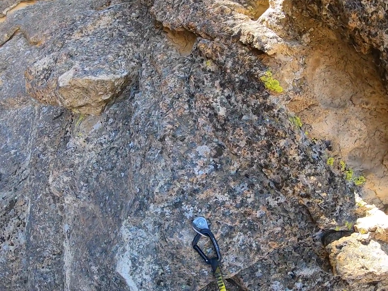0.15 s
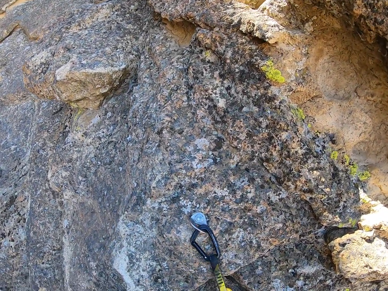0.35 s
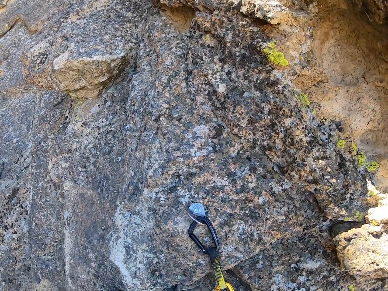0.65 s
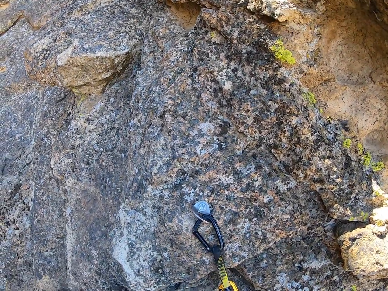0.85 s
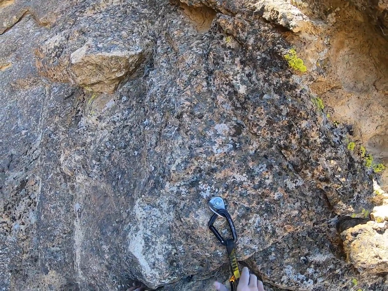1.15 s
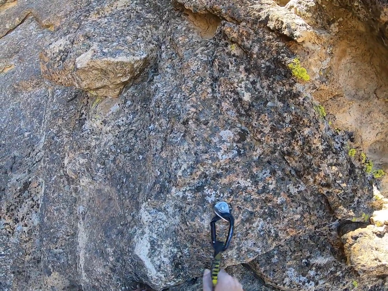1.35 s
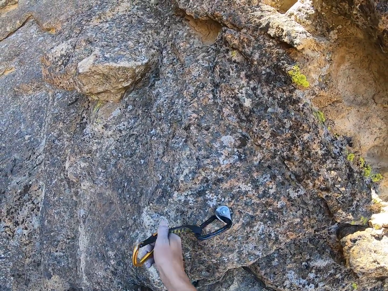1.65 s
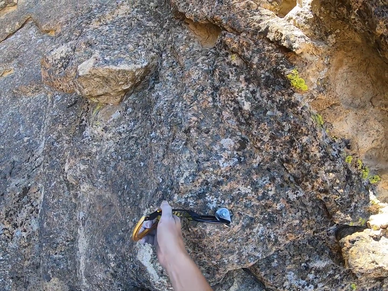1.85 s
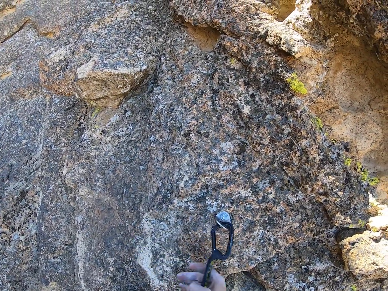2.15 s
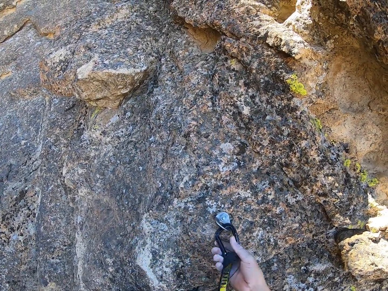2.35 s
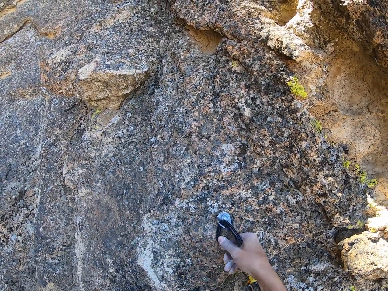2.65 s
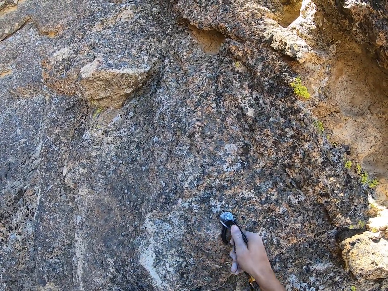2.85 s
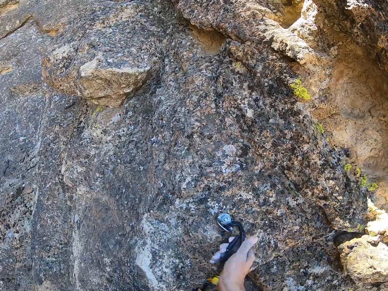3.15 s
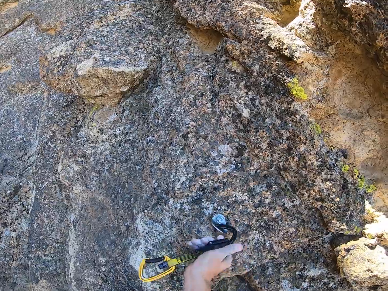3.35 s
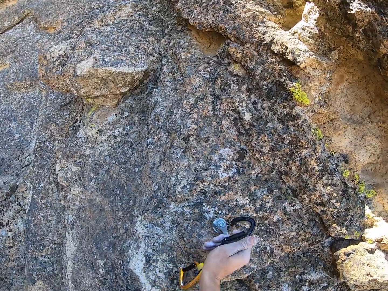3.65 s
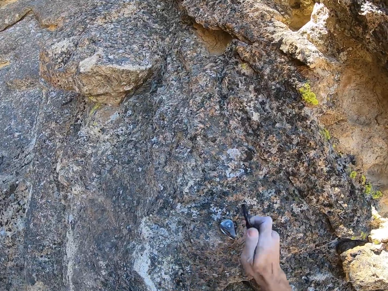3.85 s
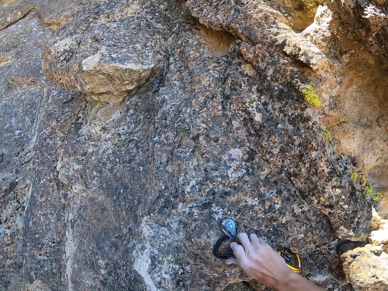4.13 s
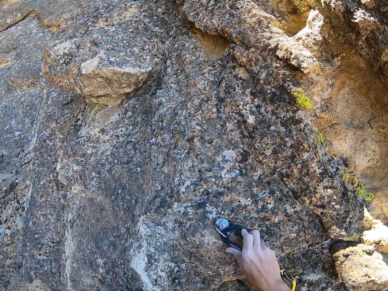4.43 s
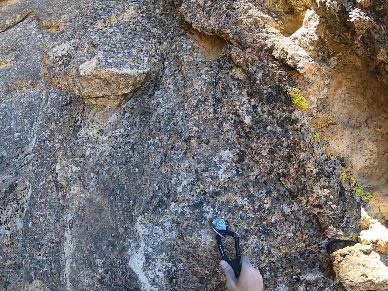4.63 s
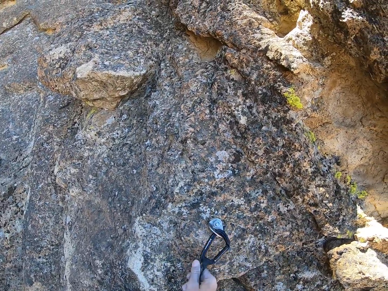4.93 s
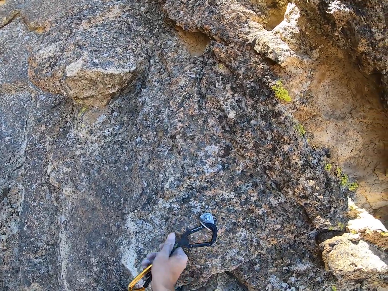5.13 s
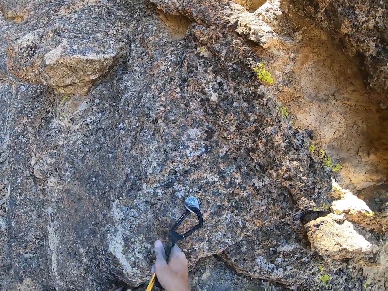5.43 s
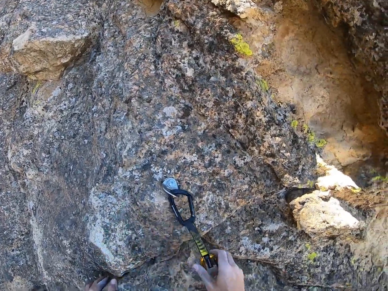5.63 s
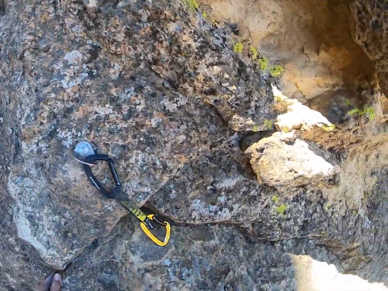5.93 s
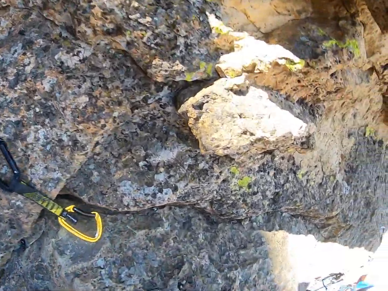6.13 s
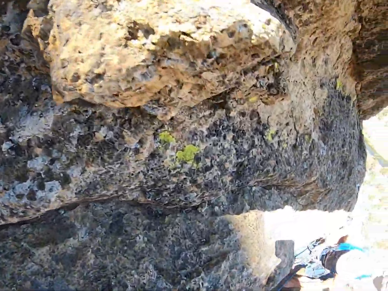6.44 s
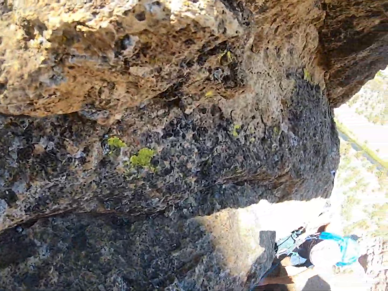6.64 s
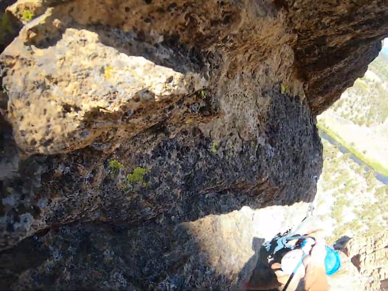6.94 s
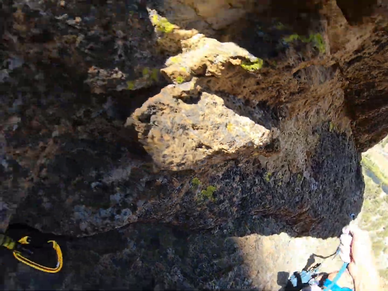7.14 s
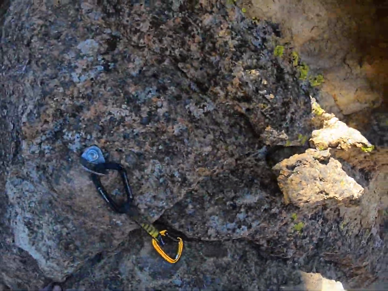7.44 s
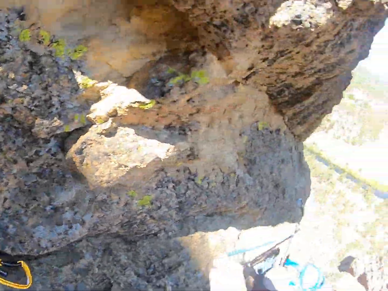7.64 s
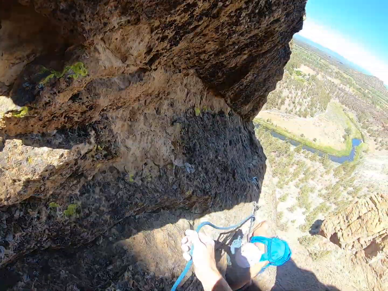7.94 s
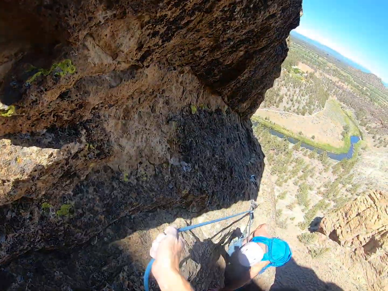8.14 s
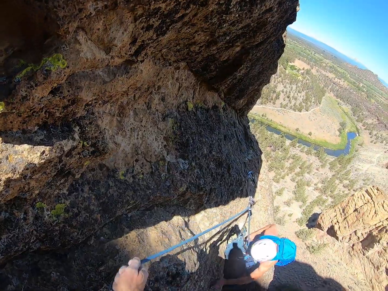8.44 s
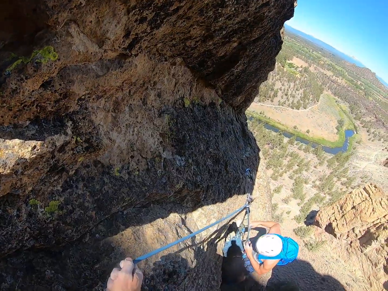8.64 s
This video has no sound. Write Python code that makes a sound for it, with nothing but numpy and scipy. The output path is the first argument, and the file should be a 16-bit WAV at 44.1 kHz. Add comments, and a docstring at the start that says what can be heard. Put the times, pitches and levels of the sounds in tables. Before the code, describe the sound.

Outdoors on a rock wall, a climber handles a quickdraw close to a head-worn microphone. Sharp, dry metal clacks come in irregular clusters, with short scrapes, skin and sling rubbing, and small gate thuds as it comes off the bolt. Firm clicks seat it again. Later the harness gear jingles brightly and a jacket brushes dully. Low wind gusts and soft bumps pass over a very faint valley wash.

```python
"""A quickdraw clacks dully on a rock face as a climber turns it, unclips it and clips it to a steel bolt hanger.
Each blow is a short burst of noise shaped by the metal; fading sines make the hanger ring and the gate thud.
Gear on the harness jingles with sines too, and filtered noise makes cloth, hands and metal rub, scrape and tap.
The rock wall echoes all this; noise gusts and soft bumps reach the head camera over a faint valley wash."""
import sys
import numpy as np
from scipy import signal
from scipy.fft import rfft, irfft
from scipy.io import wavfile
from scipy.ndimage import uniform_filter1d

SR = 44100
rng = np.random.default_rng(int(sys.argv[2]) if len(sys.argv) > 2 else 0)


def unload_audio(sound):
    """Save the sound as a 16-bit wav file, at the path given as the first command line argument."""
    columns = np.transpose(np.atleast_2d(sound))
    # keep every value between -1 and 1, then stretch to whole-number steps
    steps = np.round(np.clip(columns, -1, 1) * 32767)
    wavfile.write(sys.argv[1], SR, steps.astype(np.int16))


N = 387198  # length in samples

# Wash of the valley. Each row: frequency in Hz, relative level in dB per Hz.
VALLEY_COLOUR = [(40, 2.5), (100, -5), (190, 3), (260, -5.5), (380, -12), (800, -12), (1000, -21),
                 (1500, -20), (2400, -40), (4000, -42.5), (8000, -44.5), (15000, -62.5)]
VALLEY_DB = -56
# Gusts on the microphone. Each row: time of the height in s, length in s, level in dB before the gust trim.
GUSTS = [(0.6, 0.21, -52.5), (2.23, 0.18, -53), (3.65, 0.59, -44), (4.12, 0.38, -39.5), (4.55, 0.46, -52),
         (5.3, 0.84, -42.5), (6.33, 0.13, -42.5), (6.63, 0.31, -49), (7.27, .26, -37), (7.62, 0.084, -40),
         (8.45, 0.19, -51), (8.7, 0.11, -51.5)]
CALM_DB = -64.5  # the breeze between gusts, before the same trim
# Spectrum of the gusts. Each row: frequency in Hz, relative level in dB per Hz.
GUST_COLOUR = [(10, -9), (25, -2), (42, -1.5), (70, -10.5), (115, -11), (170, -28.5), (300, -52.5),
               (800, -57.5), (3000, -77)]
# Soft bumps of the moving body at the camera. Each row: time in s, peak in dB, frequency in Hz.
BUMPS = [(3.984, -31.5, 51.3), (4.034, -32.5, 96), (4.113, -32, 84), (5.091, -31.5, 53.2),
         (7.319, -33, 44.4)]
# The jacket brushes the camera as the climber turns to look down. Each row: time in s, level in dB.
JACKET_LEVEL = [(5.3, -79), (6.25, -57), (6.8, -57.5), (7.25, -52), (7.7, -68.5)]
# Spectrum of the jacket. Each row: frequency in Hz, relative level in dB per Hz.
JACKET_COLOUR = [(60, -10.5), (150, -5), (270, -7.5), (450, -28), (4000, -58.5)]
# Strokes of hand, sling or sleeve, one for each move.
# Each row: time of the height in s, length in s, level in dB before the rub trim.
STROKES = [(0.03, 0.23, -59), (0.6, 0.84, -62), (1.37, 0.16, -46.5), (1.66, 0.3, -59.5), (2.2, 0.18, -58),
           (2.58, 0.33, -64), (3.28, 0.67, -60), (3.76, .32, -54), (4.43, 0.1, -50.5), (4.75, 0.34, -63),
           (4.94, 0.054, -52), (5.53, 0.41, -56.5), (6.21, 0.32, -57), (6.98, .36, -56), (7.23, 0.24, -47),
           (7.55, .2, -62.5), (7.91, 0.14, -55.5), (8.19, 0.17, -53.5), (8.77, 0.12, -53.5)]
RESTING_RUB_DB = -73.5  # clothes never lie quite still; before the same trim
# Spectrum of the rubbing. Each row: frequency in Hz, relative level in dB per Hz.
RUB_COLOUR = [(200, -9), (700, 0), (1400, 4), (1950, -1.5), (2700, -1.5), (5000, -5.5), (8000, -14.5),
              (11000, -21.5), (16000, -44)]
# Fingertips tap the rock and the sling. Each row: start in s, starting level in dB.
TAPS = [(3.159, -51), (3.422, -59), (4.521, -56), (5.188, -52.5), (5.569, -52.5), (6.02, -53),
        (5.252, -54.5), (6.246, -46.5), (6.377, -50.5)]
# Spectrum of the taps. Each row: frequency in Hz, relative level in dB per Hz.
TAP_COLOUR = [(100, 12), (600, -10), (1400, 8.5), (2500, -1), (5000, -25.5), (16000, -39.5)]
# Metal slides over rock or metal, brighter on the steel of the hanger.
# Each row: start in s, length in s, level in dB before the scrape trim, treble boost in dB.
SCRAPES = [(1.303, 0.032, -53, 1.5), (1.382, 0.065, -52.5, 8), (2.213, 0.091, -53, -14),
           (2.424, 0.033, -53.5, -2), (2.461, 0.13, -55, -9), (2.586, .07, -55, -9),
           (2.751, 0.075, -58, -2), (3.189, .05, -48, -9), (3.416, 0.028, -57.5, 5), (3.635, .06, -45.5, 8),
           (3.758, 0.079, -50, 17), (4.33, 0.068, -53.5, 0), (4.425, .034, -34.5, -5),
           (5.668, 0.023, -48.5, 0), (7.842, .085, -44.5, 1), (8.176, .055, -45.5, 3.5)]
# Spectrum of the scrapes before the treble boost. Each row: frequency in Hz, relative level in dB per Hz.
SCRAPE_COLOUR = [(200, -13.5), (1400, -6), (2500, 6), (4500, 2.5), (7000, -10.5), (10500, -18),
                 (16000, -38.5)]
# Loose carabiners meet on the harness.
# Each row: start in s, level in dB, strongest mode in Hz, time that mode takes to fall 60 dB in s.
JINGLES = [(0.027, -52, 4700, 0.062), (0.135, -49.5, 3050, 0.029), (0.466, -56.5, 3720, 0.18),
           (0.498, -45.5, 3330, 0.088), (0.549, -43.5, 12300, 0.07), (0.588, -56, 2560, 0.087),
           (0.612, -53.5, 7500, 0.083), (0.659, -67, 2570, 0.31), (0.812, -51, 2510, 0.14),
           (1.158, -55, 3800, 0.038), (6.043, -42, 5570, 0.031), (6.059, -43.5, 2670, 0.04),
           (6.081, -46.5, 5300, 0.065), (6.101, -49, 2560, 0.33), (6.167, -43.5, 5400, 0.25),
           (6.209, -45.5, 3770, 0.22), (6.227, -36, 3820, 0.028), (6.263, -45.5, 4000, 0.16),
           (6.394, -42, 5450, 0.053), (6.482, -42, 5590, 0.12), (6.515, -49.5, 2470, 0.13),
           (6.699, -46, 3650, 0.11), (6.798, -46.5, 3730, 0.16), (7.148, -31, 10560, 0.14),
           (7.196, -40, 10560, 0.17), (7.845, -54.5, 2770, 0.081), (7.934, -42.5, 5170, 0.15),
           (8.128, -43.5, 2520, 0.054), (8.193, -54, 5030, .1)]
# Modes of a loose carabiner, before chance varies them. Each row: frequency in Hz, relative level in dB.
CARABINER_MODES = [(2550, -0.5), (3050, -5.5), (3650, -1), (4450, -16.5), (5300, 2), (6100, -8), (6850, 0),
                   (8150, 2), (9300, -0.5), (10550, -9), (12000, -22.5)]
# The sprung gate thuds as the carabiner comes off the bolt. Each row: start in s, level in dB.
GATE_THUDS = [(3.588, -35.5), (3.69, -39), (3.711, -42)]
# Modes of the gate. Each row: frequency in Hz, relative level in dB, time to fall 60 dB in s.
GATE_MODES = [(406, -3, 0.12), (463, -2.5, 0.043), (581, -10.5, 0.06)]
# Blows that leave the hanger free to ring until metal presses on it again.
# Each row: start in s, level in dB, free time in s.
HANGER_PINGS = [(0.264, -51, .5), (3.259, -56.5, 0.18), (3.602, -57, .18), (3.786, -50.5, 0.15),
                (3.893, -53, 0.15), (4.057, -52, 0.064), (4.111, -54, .05), (5.88, -56, 0.18)]
# Modes of the hanger. Each row: frequency in Hz, relative level in dB, time to fall 60 dB in s.
HANGER_MODES = [(3252, 0, .48), (5017, -21, .29), (6557, -18, .34), (7515, -21, .32), (9475, -15, .18),
                (10320, -13, .13), (12440, -21, .16), (13580, -29, .18)]
# Carabiner blows on hanger, rock and harness. Each row: start in s, level in dB over 10 ms, knock in dB,
# sparkle in dB, # main mode in Hz. Knock and sparkle are relative to the middle of the spectrum.
CLACKS = [(0.2388, -32.5, 1.5, 1.5, 2760), (0.2526, -40, -5.5, -6, 3050), (0.2651, -24, -10.5, -1, 9400),
          (0.2764, -37.5, -4.5, -21, 3320), (1.2954, -42, 6, -5, 2440), (1.368, -29.5, -8, -5, 4800),
          (1.3949, -39.5, -8, 2, 8440), (1.4589, -24, -19.5, -5, 5600), (1.5637, -36.5, -11.5, 2, 6660),
          (1.7486, -30.5, -14, -5.5, 4030), (2.1302, -42, -13.5, -8.5, 4100),
          (2.2854, -28, -16.5, -4.5, 5230), (2.394, -32, -18.5, -4.5, 5000), (2.4212, -43, -14, -12, 3000),
          (2.4653, -41.5, -11, -20, 3300), (2.504, -38.5, -10, -5.5, 2900), (2.5252, -36.5, 4.5, 7.5, 1220),
          (2.5484, -38, -18.5, -10, 5000), (2.7438, -28.5, -14.5, -14.5, 5100),
          (2.8262, -40.5, -7.5, -14, 2230), (2.945, -28.5, -20, -4, 5360), (3.073, -41.5, -2.5, -29, 2060),
          (3.203, -39, -17, -12, 4140), (3.2372, -36.5, -6, -8, 3500), (3.2601, -29, -13.5, 0.5, 6540),
          (3.3536, -43, -16.5, -16, 4200), (3.482, -46, -32, -15, 3680), (3.503, -48.5, -15.5, -8, 5050),
          (3.5881, -28.5, -3.5, -3, 2180), (3.6462, -39, -7, -7, 3840), (3.688, -41, -4, 4, 1190),
          (3.6992, -34, 0.5, -3, 2200), (3.7115, -36, -12.5, -7, 4840), (3.7862, -35.5, -4.5, -1.5, 2300),
          (3.8023, -34, -9, -5, 2320), (3.8308, -40.5, -7, -0.5, 2350), (3.8717, -41, -0.5, -5.5, 2280),
          (3.8934, -34.5, -7, -2, 2840), (3.9459, -41, -4.5, -9, 2420), (4.0545, -43.5, 5.5, -1, 1590),
          (4.099, -39.5, 7.5, -0.5, 1560), (4.1638, -32.5, -12, -3, 6900), (4.227, -29.5, -10, -31, 2520),
          (4.2651, -32.5, -17, -10, 4800), (4.3728, -36.5, -11, -20, 3900), (4.387, -40.5, -20, -5.5, 3260),
          (4.4177, -24.5, -23, -2, 4900), (4.422, -32, -28.5, -4.5, 5070),
          (4.4448, -24.5, -26.5, -8.5, 4360), (4.4549, -35, -5.5, -0.5, 2860),
          (4.5622, -27, -26.5, 1.5, 2900), (4.8113, -43.5, -12.5, -15.5, 3900),
          (4.8974, -39.5, -10.5, -6.5, 4700), (4.984, -47.5, -7.5, -3.5, 3740),
          (5.2998, -42.5, -12, -13, 3750), (5.8075, -30.5, -17, -5.5, 4600), (5.8823, -22, -14, -1.5, 5500),
          (5.8967, -34, 2, 4, 5870), (6.1742, -41.5, -8, -3, 5400), (7.117, -43, -0.5, -5, 2270),
          (7.148, -46, -10, 9.5, 10700), (7.1665, -36.5, -10, -1.5, 5170), (7.187, -34, -17, -14, 5260),
          (7.1951, -34.5, -23, 3, 11100), (7.2196, -42, -15, -18, 5260), (7.233, -34, -22.5, -6, 3200),
          (7.2479, -34, 0.5, -3.5, 3320), (7.3198, -37, 0.5, -7, 3730), (7.928, -34, -15.5, -19.5, 3150),
          (7.9354, -24.5, -16, -7, 5300), (8.197, -30.5, -12.5, -14.5, 5000),
          (8.7046, -36, -7.5, -11, 4600), (8.7392, -44.5, -15, -16.5, 2960)]
# Spectrum of metal contact. Each row: frequency in Hz, relative level in dB per Hz.
CLACK_COLOUR = [(100, -28), (400, -12), (800, -9.5), (1300, -2), (1850, -4.5), (2500, 2.5), (5500, 3),
                (7500, 0), (10500, -4), (13000, -16), (16000, -29.5)]
# A firm blow seats the carabiner at once, a light one chatters on:
# the time to fall 60 dB after a blow of FIRM_DB doubles for every LIGHTER_DB less.
FIRM_T60_S, FIRM_DB, LIGHTER_DB = 0.023, -31, 27.5
# Phase between the two microphone ports, for sounds from below.
# Each row: frequency in Hz, lead of the left in radians.
PORT_PHASE = [(500, 0.38), (1500, 1.06), (2300, 0.72), (3700, -0.53), (5600, -1.67), (9000, -2.07),
              (12000, -1.9)]
# Balance between the ports. Each row: frequency in Hz, left minus right in dB.
PORT_BALANCE = [(200, 3.5), (600, -2), (1200, -6), (2200, -5), (4000, -1), (8000, -1.4), (12000, -2)]
# The gear moves across the ports as the head turns. Each row: time in s, left minus right in dB.
BEARING = [(0.26, -1), (0.55, -4.5), (1.46, 0.5), (4.5, 0), (5.9, 0), (7.2, -0.5), (8.2, 2), (8.7, 2)]
EDGE_HZ = 16300  # upper edge of the camera's sound


def amp(db):
    """Turns decibels into gain."""
    return 10 ** (np.asarray(db) / 20)


def unit(x):
    """Scales a sound to an average strength (rms) of 1."""
    return x / np.sqrt(np.mean(x ** 2) + 1e-20)


def read(points, hz):
    """Reads a table of frequencies by straight lines over log frequency."""
    f, value = np.transpose(points)
    return np.interp(np.log(hz + 1), np.log(f + 1), value)


def level(curve):
    """Gives the gain at every sample from rows of time in s and level in dB."""
    return amp(np.interp(np.arange(N) / SR, *np.transpose(curve)))


def add(mix, s, sound):
    """Adds a sound into the mix at a time in seconds."""
    start = max(round(s * SR), 0)
    part = mix[:, start:][:, :sound.shape[-1]]
    part += sound[..., :part.shape[1]]


def pan(db):
    """Gives the gains of both channels for a left-right difference."""
    return unit(amp([[db / 2], [-db / 2]]))


def pair(n, same):
    """Makes two white noises that share a part of their power."""
    shared, *own = rng.standard_normal((3, n))
    same = np.clip(same, 0, 1)
    return np.sqrt(same) * shared + np.sqrt(1 - same) * np.array(own)


def colour(x, points):
    """Filters a sound by a spectrum table and scales it to rms 1."""
    n = x.shape[-1]
    gain = amp(read(points, np.fft.rfftfreq(n, 1 / SR)))
    return unit(irfft(rfft(x) * gain, n))


def wander(n, per_s):
    """Makes a slow random curve of rms 1 that keeps only changes below per_s cycles a second."""
    slow = np.fft.rfftfreq(n, 1 / SR) < per_s
    return unit(irfft(rfft(rng.standard_normal(n)) * slow, n))


def swells(rows, rest_db, edge_db, shape):
    """Gives a gain that rises from rest and falls back, edge_db lower at both ends of each event's length."""
    t = np.arange(0, N, 64)  # a coarse grid is enough for slow changes
    power = amp(rest_db) ** 2
    for s, length, db in rows:
        distance = abs(2 * (t / SR - s) / length)
        power = power + amp(db + edge_db * distance ** shape) ** 2
    return np.interp(np.arange(N), t, np.sqrt(power))


def causal(gain):
    """Builds a response with this gain that rings only after the blow (minimum phase)."""
    log = np.log(gain + 1e-5)
    mirrored = np.r_[log, log[-2:0:-1]]
    return np.exp(np.conj(signal.hilbert(mirrored)))[:len(gain)]


def ring(modes, spread=0.64):
    """Lets sines start at about rms 1 together and die away; each reaches the two ports a little differently."""
    hz, db, t60 = np.transpose(modes)
    step = np.exp((2j * np.pi * hz - np.log(1000) / t60) / SR)  # turn and loss in one sample
    waves = np.cumprod(np.broadcast_to(step[:, None], (len(hz), int(t60.max() * SR))), axis=1)
    ports = amp(db) * np.exp(1j * spread * rng.standard_normal((2, len(hz))))
    return (ports @ waves).imag / np.sqrt(np.sum(amp(db) ** 2) / 2)


def ripple(hz, depth_db, spacing_hz=520.):
    """Gives the close peaks and valleys of a carabiner's response, which change with every grip."""
    return amp(depth_db * wander(len(hz), SR * hz[1] / spacing_hz))


def valley():
    """The distant valley is a faint wash of filtered noise, wavering gently and stronger on the right."""
    wash = colour(pair(N, 0.65), VALLEY_COLOUR) * amp(1.6 * wander(N, 14))
    return amp(VALLEY_DB) * wash * pan(-4.2)


def gusts(trim_db=3.0, lumps_db=3.5):
    """Wind on the microphone is lumpy low noise, mostly unrelated at the two ports."""
    lumpy = unit(colour(pair(N, 0.24), GUST_COLOUR) * amp(lumps_db * wander(N, 23)))
    strength = swells(GUSTS, CALM_DB, edge_db=-8.0, shape=2.1)
    return amp(trim_db) * strength * lumpy


def rock_face(x, t60=0.25, wet_db=-20.0, near_t60=0.06, near_db=-18.0):
    """The rough wall and its overhang scatter back a quick echo and a thin, longer tail, both fading noise."""
    t = np.arange(SR // 2) / SR
    wall_colour = [(200, 9), (1500, 1.5), (5000, -7.0), (10000, -5), (16000, -2)]  # Hz, dB
    scatter = colour(pair(len(t), 0.51), wall_colour) * (t > .003)  # the sound needs 3 ms to return
    tail = amp(wet_db) * unit(scatter * amp(-60 * t / t60))
    near = amp(near_db) * unit(scatter * amp(-60 * t / near_t60))
    return signal.fftconvolve(x, (tail + near) / np.sqrt(len(t)), axes=1)[:, :N]


def bumps(cycles=0.65):
    """Each bump rocks the camera for a cycle or two: a low sine that swells and fades."""
    out = np.zeros((2, N))
    t = np.arange(-SR // 10, SR // 10) / SR
    for s, db, hz in BUMPS:
        phase = 2 * np.pi * rng.random() + 0.75 * rng.standard_normal((2, 1))
        swell = np.exp(-(t * hz / cycles) ** 2)
        add(out, s + t[0], amp(db) * swell * np.sin(2 * np.pi * hz * t + phase))
    return out


def jacket():
    """Cloth brushing the camera is low, dull noise that follows a level curve."""
    return level(JACKET_LEVEL) * colour(pair(N, 0.84), JACKET_COLOUR)


def grit(n, points, per_s, size_db, hiss):
    """Rubbing is many tiny slips of very unequal size over a smooth hiss."""
    sizes = amp(size_db * np.minimum(rng.exponential(1, n), 4))
    slips = (rng.random(n) < per_s / SR) * sizes
    bursts = signal.lfilter([1], [1, -np.exp(-1 / (0.0027 * SR))], slips)  # each slip fades over 2.7 ms
    return colour(pair(n, 0.5) * (unit(bursts) + hiss), points)


def rubbing(trim_db=-4.5):
    """Cloth and skin rub softly all along, louder and slightly uneven with each stroke's pressure."""
    pressure = swells(STROKES, RESTING_RUB_DB, edge_db=-6.0, shape=1.8)
    unevenness = amp(2.5 * wander(N, 20))
    weave = grit(N, RUB_COLOUR, per_s=700, size_db=2.5, hiss=0.8)
    return amp(trim_db) * pressure * unevenness * weave


def taps(t60=0.088):
    """Each fingertip tap is a burst of noise that starts at once and dies away."""
    out = np.zeros((2, N))
    t = np.arange(SR // 10) / SR
    for s, db in TAPS:
        add(out, s, amp(db - 60 * t / t60) * colour(pair(len(t), 0.66), TAP_COLOUR))
    return out


def scrapes(trim_db=1.5, ripple_db=4.5):
    """Metal slides in short strokes of gritty slips that sound its resonances."""
    out = np.zeros((2, N))
    for s, length, db, treble_db in SCRAPES:
        n = int(length * SR)
        hz = np.fft.rfftfreq(n, 1 / SR)
        slips = grit(n, SCRAPE_COLOUR, per_s=300, size_db=3.0, hiss=0.65)
        treble = amp(read([(4500, 0), (11000, treble_db)], hz))
        stroke = unit(irfft(rfft(slips) * ripple(hz, ripple_db) * treble, n))
        add(out, s, amp(db + trim_db) * stroke * signal.windows.tukey(n, .5))
    return out


def clink(t60, strongest=(), detune=0.054, uneven_db=-4.5, damping=0.3, chatter_db=4.5, chatter_t60=0.028):
    """Two loose carabiners of unlike tuning meet with a short buzz; their high modes die first."""
    hz, db = np.transpose(CARABINER_MODES + CARABINER_MODES)
    tuning, luck = rng.standard_normal((2, len(hz)))
    mode_t60 = t60 * (hz[2] / hz) ** damping
    modes = np.c_[hz * (1 + detune * tuning), db + uneven_db * luck, mode_t60]
    sound = ring(np.vstack([modes, *strongest]))
    t = np.arange(SR // 10) / SR
    buzz = colour(pair(len(t), 0.65), CLACK_COLOUR) * amp(chatter_db - 60 * t / chatter_t60)
    add(sound, 0, buzz)
    # a glancing touch builds up over about a millisecond
    return sound * (1 - np.exp(-np.arange(sound.shape[1]) / SR / .0008))


def harness(strongest_db=10.0, others_ring=0.92, rattle_s=0.099, neighbour_db=-15.0, fade_db=-11.,
            neighbour_t60=0.16, count=4):
    """Each meeting of carabiners sets neighbours on the gear loop rattling, ever more weakly."""
    out = np.zeros((2, N))
    for s, db, hz, t60 in JINGLES:
        add(out, s, amp(db) * clink(others_ring * t60, [(hz, strongest_db, t60)]))
        # late runs from 0 to 1 over the rattle
        for late in (np.arange(count) + rng.random(count)) / count:
            weaker = amp(db + neighbour_db + late * fade_db)
            add(out, s + late * rattle_s, weaker * clink(neighbour_t60))
    return out


def gate_thuds():
    """The sprung gate gives a thud of a few low, quickly dying sines."""
    out = np.zeros((2, N))
    for s, db in GATE_THUDS:
        add(out, s, amp(db) * ring(GATE_MODES))
    return out


def hanger():
    """The struck steel hanger rings freely, then dies fast once metal presses on it."""
    out = np.zeros((2, N))
    for s, db, free in HANGER_PINGS:
        sound = ring(HANGER_MODES)
        pressed = np.maximum(np.arange(sound.shape[1]) / SR - free, 0)  # s since the pressing began
        add(out, s, amp(db) * sound * np.exp(-pressed / .005))
    return out


def chatter_s(db):
    """Tells how long the chatter of a blow of this strength takes to fall by 60 dB."""
    return FIRM_T60_S * 2 ** ((FIRM_DB - db) / LIGHTER_DB)


def clack(db, knock_db, sparkle_db, main_hz, contact=5.5, main_db=6.0, width_hz=210.0, same=0.96,
          flat=0.67, ripple_db=2.5, size=4096):
    """A hard contact and a brief chatter excite a carabiner that is damped within milliseconds."""
    t, hz = np.arange(size) / SR, np.fft.rfftfreq(size, 1 / SR)
    force = pair(size, same) * amp(-60 * t / chatter_s(db))
    force[:, 7:10] += contact * np.array([.2, .6, .2])
    spectrum = rfft(force)
    # so short a contact drives all frequencies about equally: partly even out the force
    drive = uniform_filter1d((abs(spectrum) ** 2).mean(0), size=60) ** (flat / 2)
    body = 1 + amp(main_db) / np.hypot(1, (hz - main_hz) / width_hz) ** 2
    spectrum = spectrum * causal(body / drive * ripple(hz, ripple_db) * amp(read(CLACK_COLOUR, hz)))
    # how and where it lands shares the energy between knock, body and sparkle
    low = 1 / (1 + (hz / 1800) ** 8)
    high = 1 - 1 / (1 + (hz / 6500) ** 12)
    power = (abs(spectrum) ** 2).mean(0)
    shares = np.zeros(len(hz))
    for band, share_db in [(low, knock_db), (1 - low - high, 0), (high, sparkle_db)]:
        shares += band * amp(share_db) ** 2 / (band @ power)
    sound = irfft(spectrum * causal(np.sqrt(abs(shares) / shares.max())))
    return amp(db) * np.sqrt(SR / 100 / size) * unit(sound)  # level as if all fell within 10 ms


def carabiner_blows():
    """Carabiners strike hanger, rock and each other on the harness, one clack for each blow."""
    out = np.zeros((2, N))
    for s, *blow in CLACKS:
        add(out, s, clack(*blow))
    return out


def scene():
    """The gear below the camera reaches the two ports unequally and out of step; wall and air surround it."""
    hz, side = np.fft.rfftfreq(N, 1 / SR), np.array([[.5], [-.5]])  # half for each port
    ports = amp(side * read(PORT_BALANCE, hz)) * np.exp(1j * side * read(PORT_PHASE, hz))
    handling = jacket() + rubbing() + taps() + scrapes()
    metal = harness() + gate_thuds() + hanger() + carabiner_blows()
    gear = irfft(rfft(handling + metal) * ports, N) * level(BEARING) ** side
    return valley() + gusts() + rock_face(gear) + bumps() + gear


def record(dry):
    """The camera limits the band: a steep filter removes what lies above its upper edge."""
    lowpass = signal.firwin(511, EDGE_HZ, window=("kaiser", 9), fs=SR)
    return signal.oaconvolve(dry, lowpass[None], "same")


dry = scene()
out = record(dry)
unload_audio(out)
```